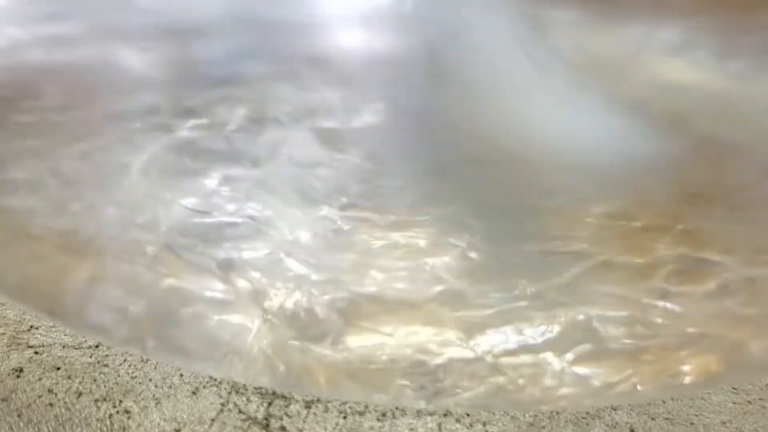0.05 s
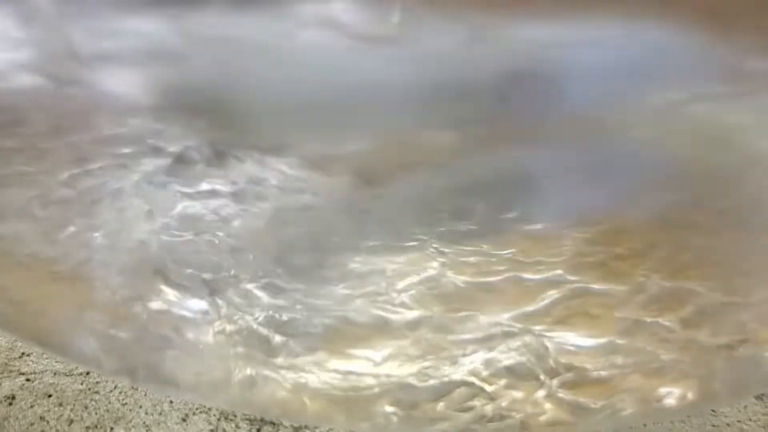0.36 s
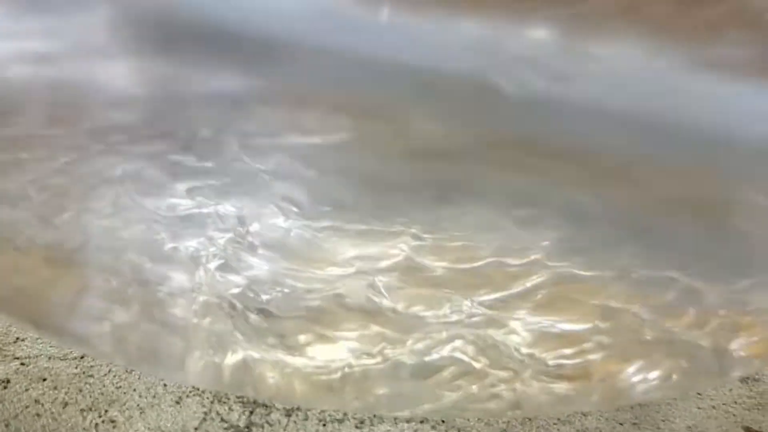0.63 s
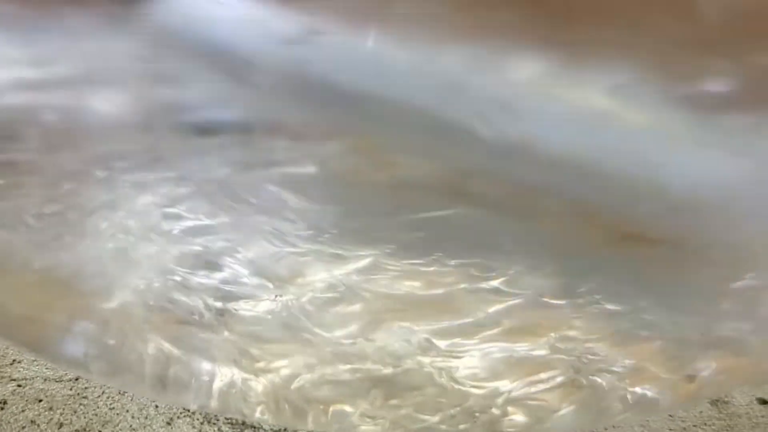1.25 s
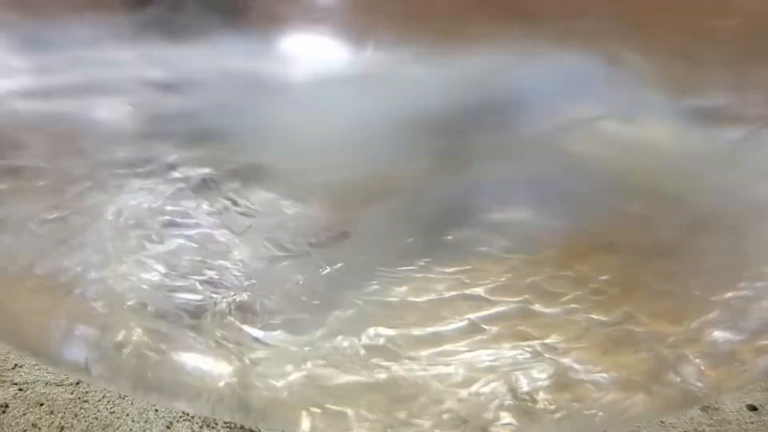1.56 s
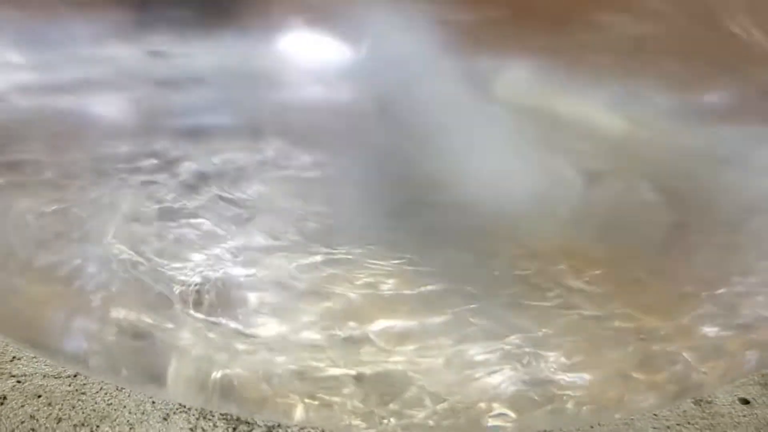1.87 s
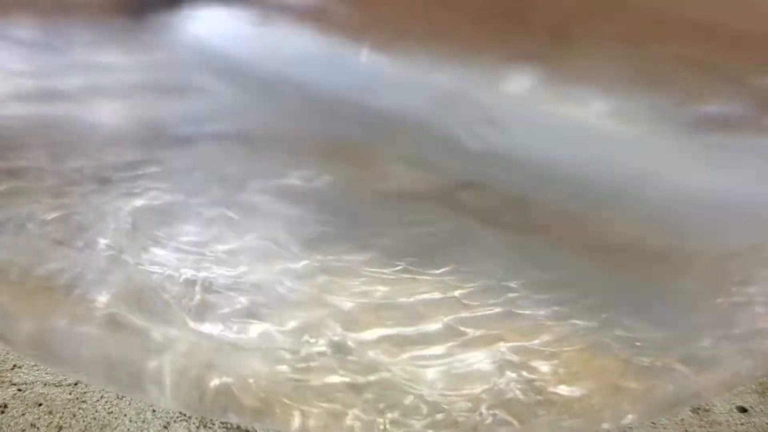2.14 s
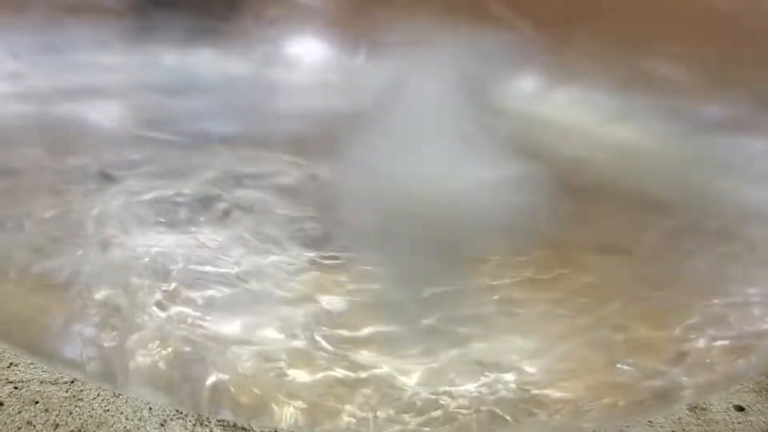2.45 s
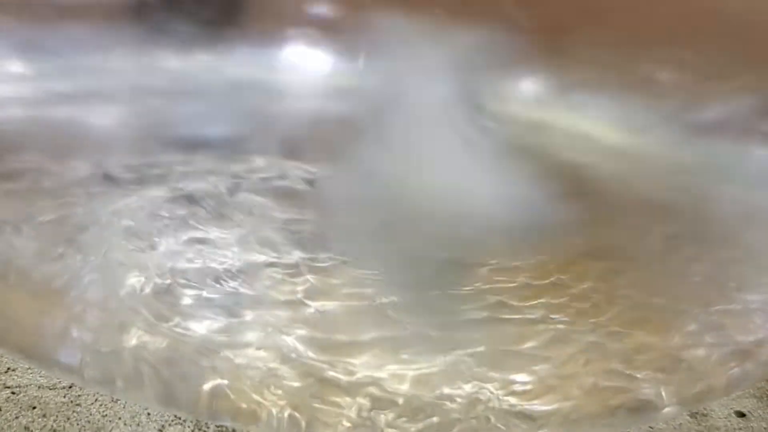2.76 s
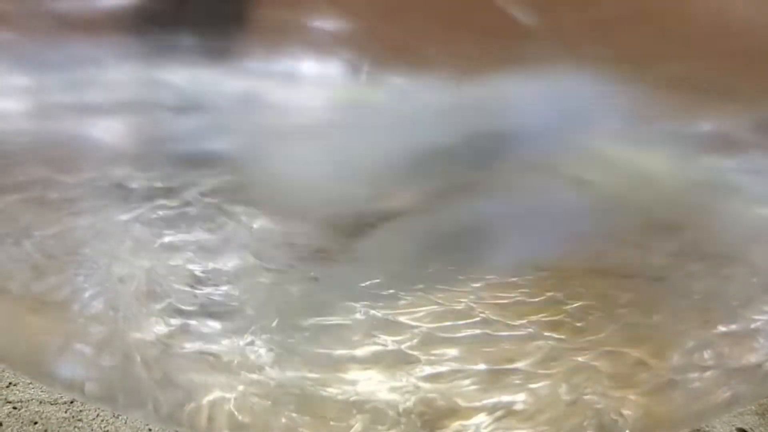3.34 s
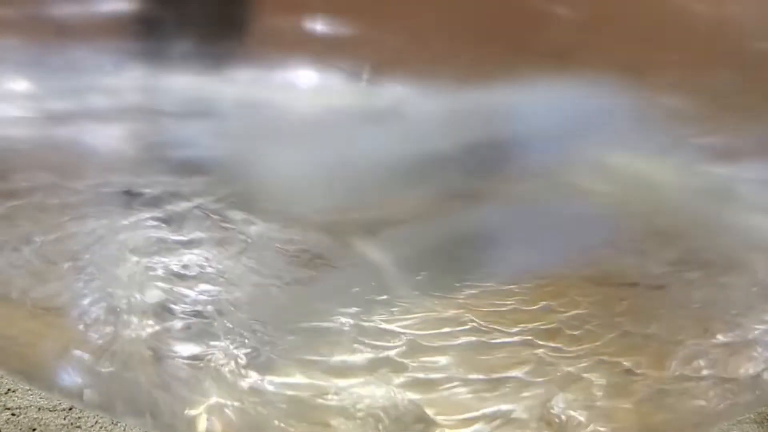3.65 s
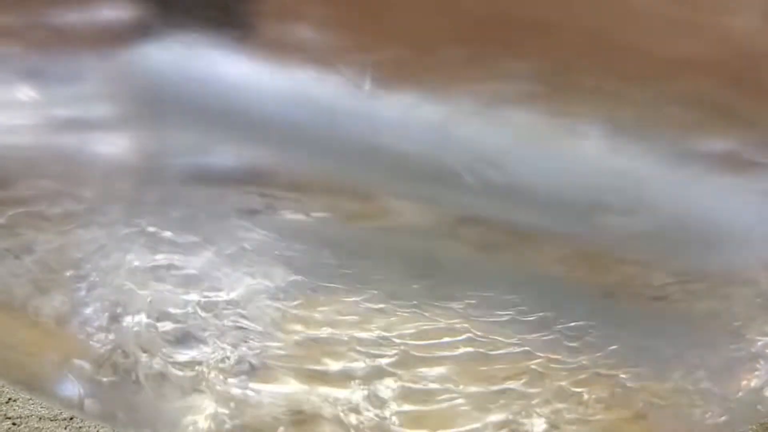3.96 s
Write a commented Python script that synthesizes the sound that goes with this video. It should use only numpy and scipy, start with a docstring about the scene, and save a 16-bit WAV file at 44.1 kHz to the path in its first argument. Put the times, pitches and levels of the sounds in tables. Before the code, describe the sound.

A magnetic stir bar knocks rapidly inside a glass vessel over a faint motor hum.

```python
"""From the start a magnetic stir bar spins off centre in a glass vessel, over motor hum and swishing liquid.
About nine times a second it scuffs, strikes and chatters on the wall, exciting the vessel's normal modes;
softer touches fall in between. Just before 1 s its tip catches the wall and the glass clinks twice.
From about 1.3 to 2.4 s come a few low, close creaks, with booms of the bench under them.
From about 2 s the glass clinks four more times, and the knocking goes on to the end at 4 s."""
import sys
import numpy as np
from scipy import signal
from scipy.fft import rfft, irfft
from scipy.io import wavfile

SR = 44100
rng = np.random.default_rng(int(sys.argv[2]) if len(sys.argv) > 2 else 0)


def put_to_file(sound):
    """Save the sound as 16-bit audio at rate SR, in the file named by the first command-line argument."""
    columns = np.atleast_2d(sound).T  # one column per channel
    safe = np.clip(columns, -1, 1)
    whole_steps = np.round(safe * 32767)
    wavfile.write(sys.argv[1], SR, whole_steps.astype(np.int16))


N = 176400

# Levels in the tables are relative.
# hard knocks on the glass: (time [s], ring level [dB], treble level [dB], scuff level [dB])
KNOCKS = [(0.0054, -19.5, -47.5, -22), (0.0562, -18.5, -46.5, -22), (0.1279, -20.5, -52.5, -13),
          (0.1707, -20, -47, -21.5), (0.2843, -18, -43.5, -5), (0.3985, -16, -32, -6.5),
          (0.5105, -19, -43, -6), (0.5265, -17, -39.5, -19), (0.6177, -18, -41.5, -5.5),
          (0.7296, -20, -43, -4.5), (0.7455, -19.5, -46.5, -14), (0.845, -18, -32, -12),
          (0.956, -20, -37.5, -7.5), (0.9719, -18, -40, -2.5), (1.0672, -16.5, -44.5, -12.5),
          (1.174, -14.5, -38.5, -23), (1.2993, -15, -30, 1.5), (1.404, -19.5, -38, -9),
          (1.513, -17, -38, -20), (1.632, -18, -40.5, -12), (1.7405, -18, -40, -5),
          (1.8539, -19.5, -40, -10), (1.9629, -19.5, -44.5, -11), (2.0753, -17.5, -42, -13.5),
          (2.1879, -16.5, -35.5, -9), (2.299, -16.5, -40.5, -13.5), (2.412, -22, -43, -13),
          (2.4274, -22, -39, -6), (2.5236, -17, -38, -5.5), (2.6322, -19.5, -49, -18.5),
          (2.745, -20.5, -43.5, -3.5), (2.7651, -21, -41.5, -8), (2.8584, -19.5, -39.5, -9),
          (2.8813, -19.5, -46, -1), (2.971, -17.5, -43, -3.5), (3.0859, -19, -46, -1),
          (3.1898, -18.5, -39.5, -13), (3.3019, -19, -42.5, -5.5), (3.4094, -19.5, -40.5, -10),
          (3.5185, -21.5, -42.5, -8.5), (3.6313, -23, -34.5, -8.5), (3.7391, -15.5, -39.5, -13),
          (3.8649, -17, -30.5, -8.5), (3.9609, -20, -41.5, -27)]
# soft touches and rebounds: (time [s], level [dB])
TOUCHES = [(0.1821, -25.5), (0.2426, -35.5), (0.294, -28), (0.3522, -29), (0.4175, -28.5), (0.69, -31),
           (0.813, -43.5), (0.858, -26), (0.914, -34.5), (1.0227, -31), (1.1326, -28), (1.2064, -28.5),
           (1.2534, -43), (1.4221, -26), (1.4753, -38.5), (1.543, -29), (1.598, -41.5), (1.6499, -25.5),
           (1.8254, -36), (1.8696, -28), (1.924, -35.5), (1.9848, -27.5), (2.0367, -38), (2.146, -32.5),
           (2.2106, -26.5), (2.268, -34.5), (2.3147, -27), (2.379, -34.5), (2.44, -29.5), (2.561, -36),
           (2.5935, -31.5), (3.2106, -29), (3.319, -26.5), (3.3664, -31), (3.478, -44), (3.546, -34),
           (3.65, -25.5), (3.701, -26), (3.769, -35), (3.887, -32.5), (3.919, -31.5), (3.9853, -32)]
# the tip of the bar catching the wall: (time [s], level [dB])
CLINKS = [(0.8488, -20.5), (0.9587, -26.5), (1.9675, -32), (2.416, -30), (2.7503, -30), (3.637, -23.5)]
# normal modes of the filled vessel: (frequency [Hz])
MODE_HZ = [1035, 1115, 1225, 1370, 1517, 2005, 2397, 2492, 2574, 2720, 3545, 4400, 4790, 4880, 5605, 6138,
           6561, 7472]
# the same modes, in order: (left level [dB], right level [dB], 60 dB decay time [s], left lag [ms])
MODES = [(-4, -6, 0.13, 0.31), (-2, -16, 0.0067, 0.42), (-33, -22.5, 0.13, 0.11), (-12, -5, 0.096, 0.32),
         (-3, 4, 0.092, 0.021), (-4.5, -21.5, 0.065, 0.32), (-1, -2, 0.049, 0.095), (1, -14.5, 0.059, 0.21),
         (-17.5, -16, 0.066, 0.2), (-13.5, -10.5, 0.43, 0.16), (-13, -21.5, 0.05, 0.016),
         (-26.5, -37, 0.18, 0.0098), (-18, -25, 0.0067, 0.06), (-15, -20, 0.091, 0.068),
         (-28, -22.5, 0.025, 0.047), (-24, -21, 0.057, 0.043), (-24.5, -28.5, 0.079, 0.06),
         (-26, -22.5, 0.053, 0.059)]
# spectrum of the dense ringing of glass, liquid and plate: (frequency [Hz], left [dB], right [dB])
BODY_SPECTRUM = [(91, -8, -13.5), (210, -0.5, 3.5), (582, -15, -8.5), (592.6, 4.5, -3), (950, -9.5, 3),
                 (1310, 6.5, 20.5), (1820, 3, 11.5), (2166, 9, 10.5), (2725, 18, 14), (3152, 5, -5.5),
                 (4030, -1.5, -9.5), (5047, -3.5, -24), (5010, -35.5, -10.5), (6220, -2, -4.5),
                 (7160, -26, -15.5), (7500, -15, -14.5), (9380, -41.5, -40), (11800, -23, -31.5),
                 (15700, -31, -33.5)]
# bands where the vessel hardly sounds: (centre [Hz], width [Hz], gain [dB])
NOTCHES = [(946, 160, -7), (1721, 180, -7.5), (2162, 131, -16), (7840, 620, -11)]
# nearby creaks: (time [s], duration [s], level [dB])
CREAKS = [(1.262, 0.073, -40.5), (1.637, 0.054, -35), (1.718, 0.064, -34.5), (1.785, 0.06, -38.5),
          (2.295, 0.066, -34.5)]
# low booms of the bench: (time [s], level [dB])
BOOMS = [(1.291, -43.5), (1.799, -41.5), (2.325, -36.5), (2.35, -36)]
# noise spectrum of motor and swirling liquid: (frequency [Hz], level [dB])
SWISH_SPECTRUM = [(30, -58), (55, -16), (90, -2), (190, 4), (280, -9.5), (450, -5.5), (620, -0.5),
                  (900, -11), (1100, -21.5), (1550, -3), (2100, -14), (2600, -9), (3800, -20),
                  (6400, -29.5), (9000, -52), (13000, -39)]

SIZE, LEAD_S = 16384, 0.02   # samples in one event's buffer; time in it ahead of the blow
AGE, FREQS = np.arange(SIZE) / SR, np.arange(SIZE // 2 + 1) * SR / SIZE
RING_HZ, TREBLE_HZ, TOP_HZ = 1386, 4700, 9000   # corners of the brightness curve
KNOCK_DB, TOUCH_DB, USUAL_TREBLE_DB = 23, 30, -19.5
CHATTER_PER_S, CHATTER_DB, CHATTER_S = 450, -6.5, 0.0053
SCUFF_LEAD_S, SCUFF_S, ROLL_AFTER_S, ROLL_S = 0.0025, 0.0028, 0.02, 0.0085
SLOSH_DETUNE_HZ, MODE_SPREAD_DB = 4.158, 1.3
BODY_T60_S, BODY_SAMENESS = 0.084, 0.65   # sameness: share of the ringing's power alike in every knock
CLICK_DB, ROOM_DB, ROOM_T60_S = 17, -26.5, 0.18
CREAK_SLIPS_PER_S, CREAK_BAND_HZ, CREAK_PAN_DB = 210, [130, 670], 11.5
HUM_HZ, HUM_DB, SWISH_DB = 58.6, -60.5, -51.5


def stir_bar():
    """Impact excitation: the bar knocks, brushes and clinks on the glass; each knock rocks the plate."""
    out = np.zeros((2, N))
    grain, colour = stereo_noise(SIZE, likeness=0.057), body_colour()
    for s, ring_db, treble_db, scuff_db in KNOCKS:
        tilt_db = treble_db - ring_db - USUAL_TREBLE_DB
        knock = contact(grain, colour, tilt_db, scuff_db, roll_db=-18.5)
        add(out, from_db(ring_db + KNOCK_DB) * knock, s - LEAD_S)
        plate = thump(hz=rng.normal(198.3, 13.1), rise_s=0.015, fall_s=0.015)
        add(out, from_db(-47.5) * plate, s)
    for s, db in TOUCHES:
        touch = contact(grain, colour, tilt_db=-18, scuff_db=-6.5, roll_db=-np.inf)
        add(out, from_db(db + TOUCH_DB) * touch, s - LEAD_S)
    for s, db in CLINKS:
        add(out, from_db(db + KNOCK_DB) * clink(grain, colour), s)
    return out


def contact(grain, colour, tilt_db, scuff_db, roll_db):
    """Convolution: the force of scuff, blow, chatter and roll drives the vessel's impulse response."""
    t = AGE - LEAD_S
    slipping = rng.random(SIZE) < CHATTER_PER_S / SR
    slips = slipping * rng.choice([-1, 1], SIZE) * rng.uniform(0.48, 1, SIZE)
    blow = slips * from_db(CHATTER_DB) * np.exp(-np.abs(t) / CHATTER_S) * (t > 0)
    blow[int(LEAD_S * SR)] = 1   # the impact, ahead of its dying chatter
    scuff = slips * from_db(scuff_db) * np.exp(-((t + SCUFF_LEAD_S) / (2 * SCUFF_S)) ** 2) * (t < 0)
    roll = slips * from_db(roll_db) * np.exp(-((t - ROLL_AFTER_S) / (2 * ROLL_S)) ** 2)
    force = rfft(blow) + rfft(scuff) * gain_at(FREQS, [RING_HZ, TREBLE_HZ], [0, -4])
    force += rfft(roll) * np.interp(FREQS, [1650, 2430], [1, 0])   # rolling feeds the low modes
    spectrum = unit_rms(vessel(grain, colour, tilt_db) * force)
    # harder contacts are brighter; the very top follows only in part
    brightness = gain_at(FREQS, [RING_HZ, TREBLE_HZ, TOP_HZ], [0, tilt_db, 0.32 * tilt_db])
    return irfft(spectrum * brightness)[:, :-SIZE // 10]


def clink(grain, colour):
    """Impulse excitation: one sharp tap puts its energy mainly into the high glass modes."""
    high_pass = minimum_phase(gain_at(FREQS, [2900, 4750], [-28, 0]))
    spectrum = vessel(grain, colour, tilt_db=19) * high_pass
    return irfft(unit_rms(spectrum))[:, :SIZE // 2]


def vessel(grain, colour, tilt_db):
    """Frequency response: main modes and dense ringing add, weakened in a few narrow bands."""
    notch_db = sum(db * np.exp(-(2 * (FREQS - hz) / width) ** 2) for hz, width, db in NOTCHES)
    return from_db(notch_db) * (glass_modes(tilt_db) + colour * dense_ringing(grain))


def glass_modes(tilt_db):
    """Normal modes: the spectrum of damped sinusoids, detuned at each tap by the moving liquid."""
    left_db, right_db, t60, lag_ms = np.transpose(MODES)
    hz = rng.normal(MODE_HZ, SLOSH_DETUNE_HZ)
    strength = from_db(rng.normal(0, MODE_SPREAD_DB, len(hz)))
    strength *= gain_at(hz, [4400, 4800], [0, 0.4 * tilt_db])   # hard taps favour the high modes
    t = AGE[:SIZE * 3 // 4]
    decay, omega = from_db(-60 * t / t60[:, None]), 2 * np.pi * hz[:, None]
    left = (strength * from_db(left_db)) @ (decay * np.sin(omega * (t - lag_ms[:, None] / 1000)))
    right = (strength * from_db(right_db)) @ (decay * np.sin(omega * t))
    onset = 1 - np.exp(-(t / 0.0001) ** 2)
    # the glass radiates little below this band
    radiation = signal.butter(2, [990, 7500], "band", fs=SR, output="sos")
    ring = signal.sosfilt(radiation, np.array([left, right]) * onset)
    return rfft(ring, SIZE) * gain_at(FREQS, [7550, 8000], [0, -24])


def dense_ringing(grain):
    """Modal overlap: the spectrum of a bare click plus decaying noise for crowded modes and room."""
    fresh = stereo_noise(SIZE, likeness=0.99)
    noise = np.sqrt(BODY_SAMENESS) * grain + np.sqrt(1 - BODY_SAMENESS) * fresh
    decay = from_db(-60 * AGE / BODY_T60_S) + from_db(ROOM_DB - 60 * AGE / ROOM_T60_S)
    return from_db(CLICK_DB) + rfft(decay * noise)


def body_colour():
    """Interaural level and delay: a filter for the dense ringing in each ear, the left 0.15 ms late."""
    hz, *ears_db = np.transpose(BODY_SPECTRUM)
    gains = from_db(-2.5) * np.array([gain_at(FREQS, hz, db) for db in ears_db])
    delay_s = np.array([[0.00015], [0]])
    return minimum_phase(gains) * np.exp(-2j * np.pi * FREQS * delay_s)


def thump(hz, rise_s, fall_s):
    """Damped oscillation: a low note of plate or bench swells softly and dies; its peak is 1."""
    note = np.sin(2 * np.pi * hz * AGE) * (1 - np.exp(-(AGE / rise_s) ** 2)) * np.exp(-AGE / fall_s)
    return note[None] / note.max()


def creaks():
    """Stick-slip friction: short runs of dull pulses on the left, some over a boom of the bench."""
    out = np.zeros((2, N))
    pan = from_db(np.array([[0.5], [-0.5]]) * CREAK_PAN_DB)
    dull = signal.butter(2, CREAK_BAND_HZ, "band", fs=SR, output="sos")
    for s, duration, db in CREAKS:
        times = np.cumsum(rng.uniform(0.4, 1.4, 40)) / CREAK_SLIPS_PER_S
        slips = np.zeros(SIZE)
        slips[(times[times < duration] * SR).astype(int)] = 1
        creak = signal.sosfilt(dull, slips + 1e-18)
        add(out, pan * from_db(db) * 0.5 * creak / np.abs(creak).max(), s)
    for s, db in BOOMS:
        add(out, pan * from_db(db) * thump(hz=144, rise_s=0.011, fall_s=0.042), s - 0.011)
    return out


def stirrer():
    """Tone and broadband noise: the motor hums steadily under the even swish of motor and liquid."""
    shape = gain_at(np.arange(N // 2 + 1) * SR / N, *np.transpose(SWISH_SPECTRUM))
    swish = irfft(rfft(stereo_noise(N, likeness=0.82)) * shape, N)
    hum = np.sqrt(2) * np.sin(2 * np.pi * HUM_HZ * np.arange(N) / SR)
    return from_db(SWISH_DB) * swish / swish.std() + from_db(HUM_DB) * hum


def stereo_noise(size, likeness):
    """Partial coherence: white noise with a share of its power common to both ears."""
    common, separate = rng.standard_normal(size), rng.standard_normal((2, size))
    return np.sqrt(likeness) * common + np.sqrt(1 - likeness) * separate


def minimum_phase(gain):
    """Causality: a filter with these gains that never sounds before its input."""
    cepstrum = irfft(np.log(gain + 1e-9))
    fold = 1 + np.sign(np.sin(2 * np.pi * np.arange(SIZE) / SIZE))
    return np.exp(rfft(cepstrum * fold))


def unit_rms(spectrum):
    """Normalisation to a mean square of 1."""
    return spectrum / np.sqrt(np.mean(np.abs(spectrum) ** 2))


def from_db(db):
    """Amplitude ratio of a level in decibels."""
    return 10 ** (np.asarray(db) / 20)


def gain_at(hz, points_hz, points_db):
    """Gain by interpolation of levels on a log-frequency axis."""
    return from_db(np.interp(np.log(hz + 1), np.log(points_hz), points_db))


def add(out, sound, s):
    """Superposition of a sound on the mix, starting at s seconds."""
    start = int(s * SR)
    first, end = max(start, 0), min(start + sound.shape[1], N)
    if end > first:
        out[:, first:end] += sound[:, first - start:end - start]


def scene():
    """Linear superposition: the pressures of all sources add."""
    return stir_bar() + creaks() + stirrer()


def record(dry):
    """Band limiting: a steep low-pass filter, 60 dB down at 16.7 kHz."""
    return signal.sosfilt(signal.cheby2(16, 60, 16700, fs=SR, output="sos"), dry)


dry = scene()
out = record(dry)
put_to_file(out)
```